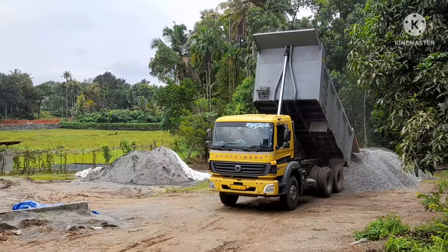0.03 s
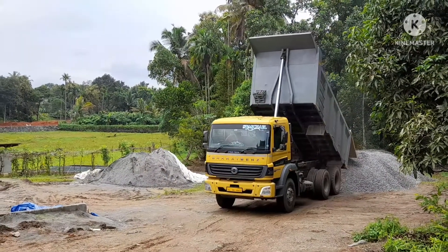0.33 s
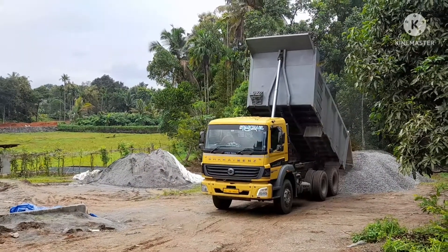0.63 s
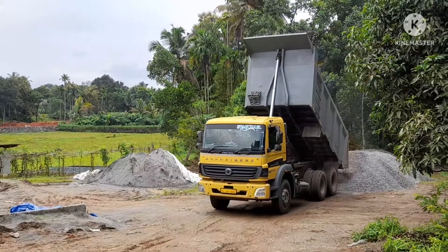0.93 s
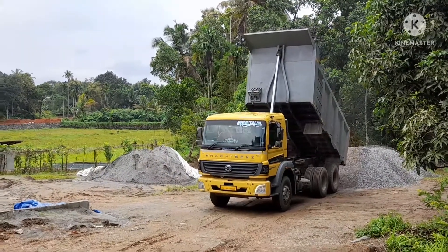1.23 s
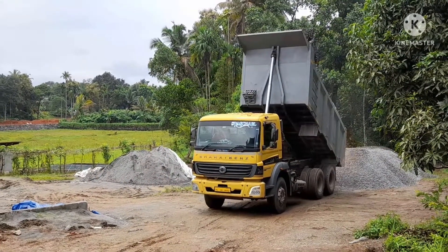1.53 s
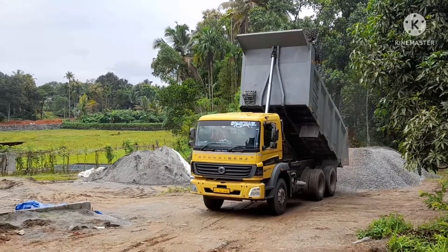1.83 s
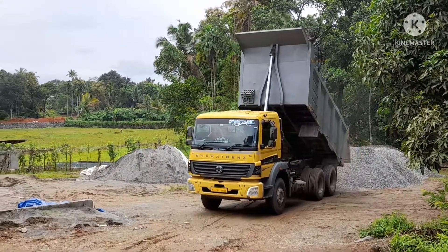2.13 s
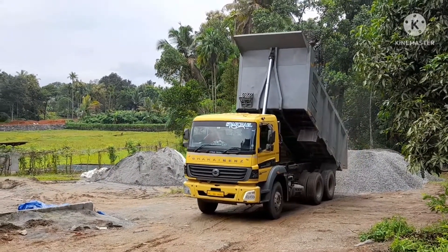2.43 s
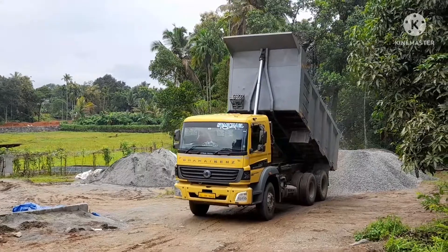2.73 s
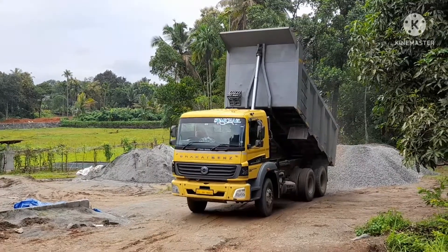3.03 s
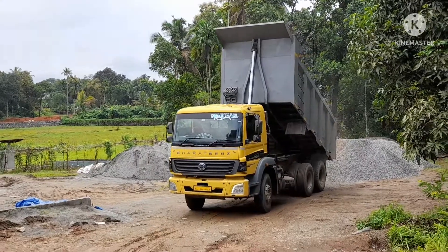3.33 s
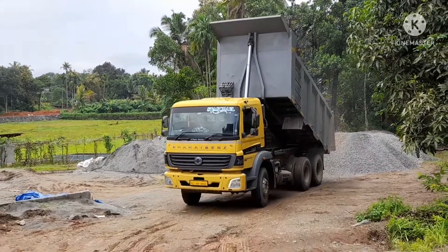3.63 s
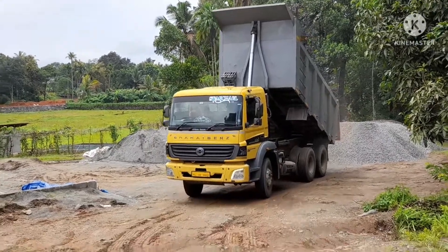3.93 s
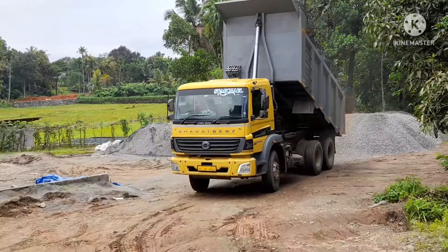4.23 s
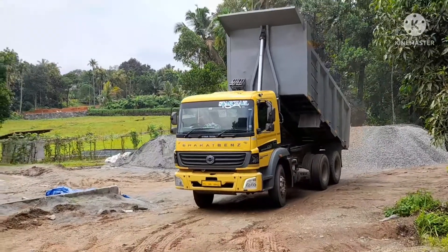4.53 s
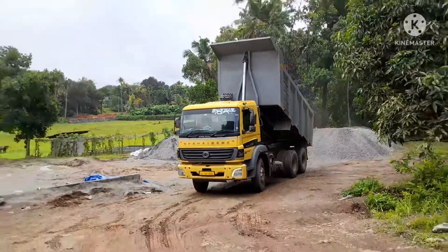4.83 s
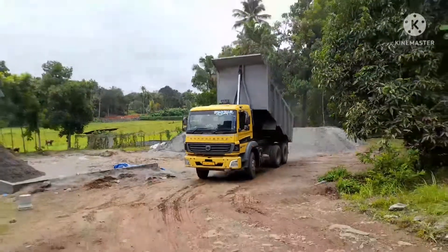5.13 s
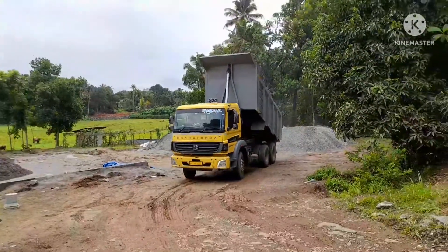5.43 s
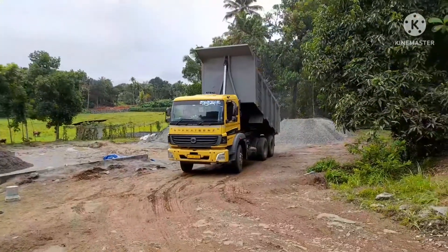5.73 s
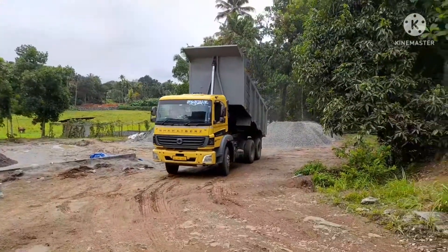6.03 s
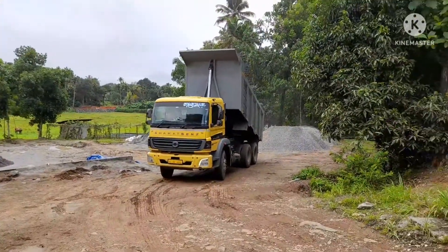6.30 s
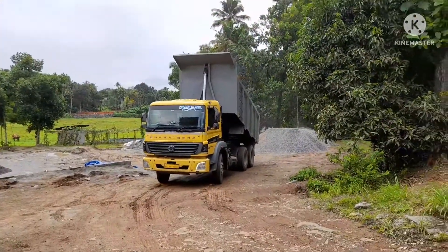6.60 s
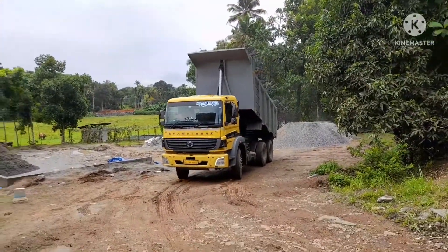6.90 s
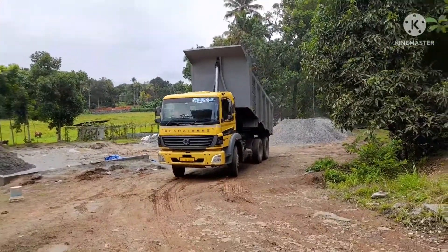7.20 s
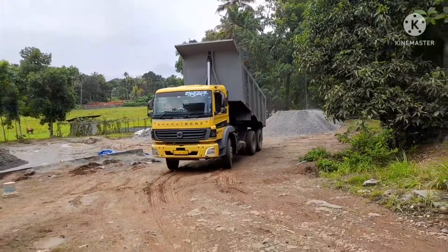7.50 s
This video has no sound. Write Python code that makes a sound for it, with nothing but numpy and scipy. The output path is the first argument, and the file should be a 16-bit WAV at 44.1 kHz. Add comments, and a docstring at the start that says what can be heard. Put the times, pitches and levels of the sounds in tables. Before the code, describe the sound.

Loud clanks and ringing metal booms from a tipper truck's swinging tailgate, as the diesel rumbles and tyres crunch on gravel.

```python
"""Tipper truck in a gravel yard

Beside the truck, on a phone's two microphones. Insects shrill in the trees around the yard.
The diesel runs at a fast idle and the tyres crunch as the truck jerks forward, steel bed raised.
The last gravel slides out, then the hanging tailgate slams against the bed again and again and the
big plates boom. Each heavy slam turns the phone's gain down, and the yard slowly swells back."""
import sys
import numpy as np
from scipy import signal
from scipy.fft import rfft, irfft, next_fast_len
from scipy.io import wavfile
from scipy.ndimage import uniform_filter1d

SR = 44100
rng = np.random.default_rng(int(sys.argv[2]) if len(sys.argv) > 2 else 0)


def bounce(signal):
    """Save signal as a 16-bit WAV file at the path given by the first command-line argument."""
    frames = np.transpose(np.atleast_2d(signal))
    limited = np.clip(frames, -1, 1)
    pcm = np.round(limited * 32767).astype(np.int16)
    wavfile.write(sys.argv[1], SR, pcm)


N = 333396
T = np.arange(N) / SR
TOP_HZ = 15500
SIDES = np.array([[1], [-1]])  # left and right microphone
BED_LEAD_S, ENGINE_LEAD_S = -0.0000423, 0.00042  # how much sooner the left one hears each source


def undb(db):
    """Decibels to gain."""
    return 10 ** (np.asarray(db) / 20)


def unit(x):
    """Scale to rms 1."""
    return x / np.sqrt(np.mean(x ** 2))


def noise(count=N):
    """Two independent channels of white noise."""
    return rng.standard_normal((2, count))


def walk(rate_hz):
    """A smooth random drift, rms 1."""
    hold = max(int(SR / rate_hz), 1)
    steps = np.repeat(rng.standard_normal(N // hold + 1), hold)
    return unit(uniform_filter1d(uniform_filter1d(steps, hold), hold)[:N])


def grains(per_s, spread_db):
    """A shower of tiny clicks, most faint and a few strong."""
    size = undb(spread_db * np.minimum(rng.exponential(size=(2, N)), 4))
    return (rng.random((2, N)) < per_s / SR) * size * noise()


def fade(t, t60):
    """Free decay, 60 dB in t60 seconds."""
    return np.exp(-np.log(1000) * t / t60)


def burst(t, rise_s, t60):
    """A quickening rise, then free decay."""
    return np.minimum(t / rise_s, 1) ** 2 * fade(np.maximum(t - rise_s, 0), t60)


def envelope(start_s, length_s, rise_s, fall_s):
    """Attack, hold and release, between 0 and 1."""
    return np.clip((T - start_s) / rise_s, 0, 1) * np.clip(1 - (T - start_s - length_s) / fall_s, 0, 1)


def add(out, start_s, x):
    """Mix x into out from start_s on."""
    i = int(start_s * SR)
    out[:, i:i + x.shape[-1]] += x[:, :N - i]


def across(hz, rows):
    """Each column of a frequency table, read on a log axis."""
    points, *columns = np.transpose(rows)
    return [np.interp(np.log(hz + 1), np.log(points), column) for column in columns]


# Scatter from the trees, and balance at the phone: f/Hz, side minus mid/dB, left minus right/dB
YARD_IMAGE = [(60.6, -14, -10), (153.6, -25, -0.5), (320, -15, -1.2), (650, -11, -0.76), (1290, -1.5, -0.5),
              (2720, -3.5, 0.5), (5500, -0.5, -1.5), (9000, -1, -3.5), (12400, 0, 2.5)]
def at_mics(x, spectrum, lead_s=0, tilt_db=0):
    """Give a direct and a scattered signal a spectrum and place them on the two microphones; rms 1."""
    size = next_fast_len(x.shape[-1])
    hz = np.fft.rfftfreq(size, 1 / SR)
    side_db, pan_db = across(hz, YARD_IMAGE)
    gain = undb(across(hz, spectrum)[0] + tilt_db * np.log2(1 + hz / 1000))
    mid, side = rfft(x, size) * gain / np.sqrt(1 + undb(side_db) ** 2)
    pair = (mid + SIDES * side * undb(side_db)) * undb(SIDES * pan_db / 2)
    time_shift = np.exp(1j * np.pi * hz * lead_s * SIDES)
    return unit(irfft(pair * time_shift, size)[:, :x.shape[-1]])


# The shrill band from the trees all around: f/Hz, relative level/dB
CHORUS_SPECTRUM = [(7400, -28), (8300, -21.5), (8620, -8.5), (8800, -8.5), (8960, -0.5), (9200, -5.5),
                   (9600, -12.5), (10400, -20.5), (12000, -32)]
# Its slow swell and sinking: t/s, level/dB
CHORUS_SWELL = [(0, -41.5), (1.8, -39.5), (3.6, -39), (4.2, -41), (6, -42.5), (7.5, -42.5)]
def insect_chorus():
    """Many insects overlap in one narrow, shimmering band."""
    level_db = np.interp(T, *np.transpose(CHORUS_SWELL)) + 0.86 * walk(28)
    return undb(level_db) * at_mics(noise(), CHORUS_SPECTRUM)


# Single calls from the trees: t/s, length/s, level/dB, f/Hz
INSECT_CALLS = [(3.7, .5, -52, 4300), (4.6, 1.05, -55.5, 5030), (5.845, 0.24, -47, 4230),
                (6.35, 1.23, -47.5, 4490)]
def insect_buzzes(rasp_hz=260, pulse_hz=8.2, pulse_db=3):
    """An octave below the chorus, thin buzzes pulse and waver in pitch."""
    rasp = unit(signal.sosfilt(signal.butter(2, rasp_hz, fs=SR, output="sos"), noise()))
    clock = np.cumsum(1 + 0.01 * walk(19)) / SR
    pulsing_db = pulse_db * np.sin(2 * np.pi * pulse_hz * T + walk(3.1)) + 1.2 * walk(14)
    out = 0
    for start_s, length_s, db, hz in INSECT_CALLS:
        call = undb(db + pulsing_db) * envelope(start_s, length_s, rise_s=0.072, fall_s=0.12)
        out += call * rasp * np.sqrt(2) * np.sin(2 * np.pi * hz * clock)
    return out


# Grit on the yard floor: f/Hz, relative level/dB
GRIT_SPECTRUM = [(1500, -40), (3000, -4), (4500, -2), (5900, -9.5), (7500, -9), (10000, -4.5),
                 (12000, -6.5), (15500, -19.5)]
# Stones snapping out from under the load and the tyres: t/s, level/dB
STONE_SNAPS = [(.27, -38), (3.765, -34), (3.975, -37)]
def tyres(effort, coasting_db=-44.5, effort_db=4):
    """Chippings grind under the tread; now and then one snaps."""
    level_db = coasting_db + effort_db * effort + 0.8 * walk(12)
    out = undb(level_db) * at_mics(grains(per_s=9000, spread_db=0.91), GRIT_SPECTRUM)
    t = T[:SR // 4]
    for start_s, db in STONE_SNAPS:
        add(out, start_s, undb(db) * fade(t, t60=0.28) * at_mics(noise(len(t)), GRIT_SPECTRUM))
    return out


# Chippings hissing down the raised bed: f/Hz, relative level/dB
SLIDE_SPECTRUM = [(2000, -14), (4500, -7), (6200, -10.5), (8000, -3.5), (9500, 1.5), (11000, -3),
                  (13000, -7.5), (15500, -8)]
def gravel_slide(start_db=-43, growth_db_per_s=7.5, shut_s=1.44):
    """Gravel leaves the steel floor ever faster, until the gate shuts on it."""
    flow_db = start_db + growth_db_per_s * np.minimum(T, shut_s) + 0.7 * walk(14)
    dying = fade(np.maximum(T - shut_s, 0), t60=0.55)
    return undb(flow_db) * dying * at_mics(grains(per_s=7000, spread_db=1.1), SLIDE_SPECTRUM)


def shaft_tone(clock, hz, db, waver_db=3.03):
    """One tone locked to the engine shaft, wavering in level."""
    arrival = clock + SIDES * ENGINE_LEAD_S / 2
    level = undb(db - 1 + waver_db * walk(22))
    return level * np.sqrt(2) * np.sin(2 * np.pi * (hz * arrival + rng.random()))


# The hoist pump at work: t/s, length/s, relative level/dB
HOIST_RUNS = [(-.1, 0.586, -38.5), (0.603, 0.78, -41), (4.45, .4, -44)]
# Its whine: f/Hz, relative level/dB
HOIST_TONES = [(490, 1), (571, -2), (689, -8)]
def hoist_pump(clock, rise_s=0.104, fall_s=0.327):
    """The pump whines under load, its pitch riding on the shaft speed."""
    load = sum(undb(db) * envelope(s, length_s, rise_s, fall_s) for s, length_s, db in HOIST_RUNS)
    return load * sum(shaft_tone(clock, hz, db) for hz, db in HOIST_TONES)


# Exhaust rumble, reaching the left microphone first: f/Hz, relative level/dB
EXHAUST_SPECTRUM = [(22, -40), (40, -25), (65, -13.5), (100, -2), (170, -2.5), (250, -3.5), (330, -10),
                    (420, -13.5), (600, -23), (900, -33), (1500, -63.5)]
# Diesel clatter from the same side: f/Hz, relative level/dB
BLOCK_SPECTRUM = [(300, -7), (550, -1.5), (800, 1), (1100, -2.5), (2000, -7.5), (2900, -13), (4500, -16),
                  (8000, -30)]
# Engine hum: f/Hz, relative level/dB
HUM_TONES = [(107.7, -7.5), (166.5, -10), (215.4, -8.5), (443, -22.5), (543.5, -18.5), (866.5, -16),
             (1266, -18)]
def diesel(effort, firing_hz=53.7, throb=0.18, knock=0.077):
    """Each firing puffs into the exhaust and knocks in the block; the shaft hums and drives the pump."""
    exhaust_db, block_db = -30 + 5 * effort, -33 + 2 * effort
    clock = np.cumsum(1 + 0.00395 * walk(3) + 0.0061 * walk(25)) / SR  # slightly uneven shaft speed
    firing = np.cos(2 * np.pi * firing_hz * clock)
    puffs = at_mics(noise() * (1 + throb * firing), EXHAUST_SPECTRUM, ENGINE_LEAD_S)
    clatter = noise() * undb(0.8 * walk(30))
    knocks = at_mics(clatter * (1 + knock * firing), BLOCK_SPECTRUM, ENGINE_LEAD_S)
    hum = sum(shaft_tone(clock, hz, exhaust_db + 1.5 + db) for hz, db in HUM_TONES)
    return undb(exhaust_db) * puffs + undb(block_db) * knocks + hum + hoist_pump(clock)


def ragged(spectrum, depth_db, count=420):
    """Split a smooth spectrum into the many narrow peaks and gaps of welded steel."""
    hz = np.geomspace(spectrum[0][0], TOP_HZ, count)
    peaks_db = depth_db * np.clip(rng.standard_normal(count), -2, 2)
    return np.column_stack([hz, across(hz, spectrum)[0] + peaks_db])


def strike(hz, boom_db, clang_db, ring):
    """A heavy, long-ringing blow shakes the whole bed, a sharp one the panels; a light one is dull."""
    weight = ring - 0.95
    whole_bed_db, treble_db = 16 * weight, clang_db + 12 * weight
    spectrum = [(55, whole_bed_db), (105, boom_db + whole_bed_db / 2), (210, boom_db), (380, 0.012),
                (720, clang_db), (1000, clang_db), (1600, treble_db)]
    return undb(across(hz, spectrum)[0])


# Decay of the plates at a ring factor of 1: f/Hz, t60/s
PLATE_DECAY = [(50, 2.8), (120, 3.97), (260, 3.75), (480, 1.995), (800, 1.71), (1300, 1.16), (3000, 1.07)]
def plates(t, spectrum, boom_db, clang_db, ring):
    """Countless overlapping plate modes; the low ones ring longest."""
    hz = np.fft.rfftfreq(len(t), 1 / SR)
    struck = rfft(at_mics(noise(len(t)), spectrum, BED_LEAD_S)) * strike(hz, boom_db, clang_db, ring)
    centres_hz, t60s = np.transpose(PLATE_DECAY)
    out = 0
    for share, t60 in zip(np.eye(len(t60s)), t60s):
        band = irfft(struck * np.interp(hz, centres_hz, share), len(t))
        out += band * fade(t, t60 * ring)
    return out


# Notes that stand out of the boom: f/Hz, relative level/dB, t60/s at a ring factor of 1, build-up/s
BED_NOTES = [(39.4, -18, 0.92, .01), (56.4, -15, 3, 0.011), (57.3, -22.5, 4.9, 0.021),
             (92.4, -8.5, 2.55, 0.12), (114.26, -5.5, 2.57, 0.11), (143.86, -8.5, 1.7, 0.0064),
             (156.62, -11.5, 2.66, 0.053), (195.3, -8, 2.02, 0.022), (264.9, -13, 2.81, 0.049),
             (357.5, -12.5, 1.93, 0.011), (472, -24.5, 1.9, 0.021), (543, -22.5, 1.4, 0.0086),
             (627, -19, 0.63, 0.0059), (701.3, -14, 1.15, 0.008), (775, -23.5, 2.1, 0.009),
             (828, -23, 1.2, .01), (866, -17, 0.59, 0.0085), (914, -22, 0.78, 0.0146),
             (1394, -23, 0.67, 0.011)]
def bed_modes(t, boom_db, clang_db, ring, gain_db=2.5, scatter_db=1.2, scatter_s=0.001296):
    """The bed's strongest modes; each blow lands a little differently and stirs another mix of them."""
    out = 0
    for hz, db, t60, build_s in BED_NOTES:
        size, path = rng.standard_normal(2)
        level = undb(db + gain_db + scatter_db * size) * strike(hz, boom_db, clang_db, ring)
        shape = (1 - np.exp(-t / build_s)) * fade(t, t60 * ring)
        arrival = t + scatter_s * path + SIDES * BED_LEAD_S / 2
        out += level * shape * np.sin(2 * np.pi * hz * arrival)
    return out


# The bed's crowded plate modes: f/Hz, relative level/dB
PLATE_SPECTRUM = [(28, -42), (55, -13), (75, -38), (100, -7), (150, -4), (250, -2), (360, -7.5), (415, -14),
                  (480, -7), (740, -7.5), (900, -12.5), (1080, -16), (1900, -21), (3000, -32.5),
                  (7000, -55)]
# Steel on steel at the contact: f/Hz, relative level/dB
CLANK_SPECTRUM = [(500, -1), (1300, 1.5), (2000, -1.5), (2800, 1.5), (3800, 3.5), (4900, -1.5),
                  (6000, -7.5), (7500, -11), (9500, -7), (12000, -15), (15500, -26.5)]
# Slams in the foreground, almost centred between the microphones: t/s, level/dB, boom/dB, clang/dB,
# ring factor, clank/dB, clank tilt/(dB per octave), rattle/dB, rattle t60/s
SLAMS = [(0.476, -14, -0.5, -2.5, .26, -35.5, 1.5, -38, .3),
         (0.520, -20.5, 5.5, -10, 0.26, -36, 3.5, -37, .2), (1.389, -5, 1, 4.5, 0.94, -10, 2, -13, 1),
         (3.038, -7.5, 1.5, 1.5, 0.94, -10.5, 1, -14, 1), (4.928, -15, 3.5, 0, 0.94, -10.5, 3.5, -16, 0.52),
         (6.638, -13.3, 4.5, 1, 0.85, -2, -5.5, -12, 0.48),
         (7.438, -23.5, 8, -3.5, 0.41, -17.5, 4.5, -31, .3)]
def tailgate(spread_s=0.013, punch=0.25, rebound_s=0.053):
    """The gate lands with a clank and rattles on its hinges; the blow spreads through the bed and booms."""
    out, t = np.zeros((2, N)), T[:2 * SR]
    bed, edge = ragged(PLATE_SPECTRUM, depth_db=2.4), ragged(CLANK_SPECTRUM, depth_db=3.2)
    # the struck end sounds loudest, until the energy has spread over the whole bed
    swell = np.minimum(t / spread_s, 1) + punch * burst(t, spread_s, t60=0.78)
    for start_s, db, boom_db, clang_db, ring, clank_db, tilt_db, rattle_db, rattle_t60 in SLAMS:
        body = plates(t, bed, boom_db, clang_db, ring) + bed_modes(t, boom_db, clang_db, ring)
        contact = undb(clank_db) * burst(t, rise_s=0.0083, t60=0.16)
        # the loose gate chatters hardest as it comes back from the rebound
        rattle = undb(rattle_db + 0.6 * walk(71.7)[:len(t)]) * burst(t, rebound_s, rattle_t60)
        steel = at_mics(noise(len(t)), edge, BED_LEAD_S, tilt_db)
        add(out, start_s, undb(db) * (body * swell + steel * (contact + rattle)))
    return out


# The driver pulls across the yard in short lurches: t/s, length/s, effort (0-1)
PULLS = [(-.1, 0.62, 0.95), (0.94, 0.56, .5), (2.85, .2, 0.45), (4.603, 0.38, 0.66), (5.777, .25, 0.52),
         (6.4, 0.28, 0.5)]
def scene():
    """The truck and the trees around it; one effort drives exhaust, clatter, hum and tyres."""
    effort = sum(push * envelope(s, length_s, rise_s=0.12, fall_s=0.5) for s, length_s, push in PULLS)
    truck = diesel(effort) + tailgate() + gravel_slide() + tyres(effort)
    return truck + insect_chorus() + insect_buzzes()


def gain_control(x, ceiling_db=-10, listen_s=0.03, recovery_db_per_s=2.5):
    """Whatever passes the rms ceiling turns the phone's gain down at once; it then creeps back up."""
    power = uniform_filter1d(np.mean(x ** 2, axis=0), int(listen_s * SR))
    over_db = np.maximum(10 * np.log10(np.abs(power) + 1e-12) - ceiling_db, 0)
    recovered_db = recovery_db_per_s * T
    return x * undb(recovered_db - np.maximum.accumulate(over_db + recovered_db))


def record(dry):
    """The phone ducks after each heavy slam, rounds the highest peaks and cuts the top."""
    held = gain_control(dry)
    rounded = held / (1 + held ** 6) ** (1 / 6)
    return signal.sosfilt(signal.ellip(10, 0.1, 80, TOP_HZ, fs=SR, output="sos"), rounded)


dry = scene()
out = record(dry)
bounce(out)
```